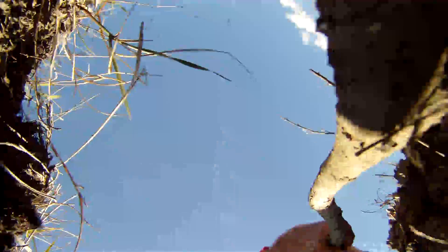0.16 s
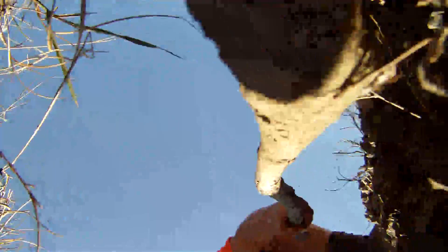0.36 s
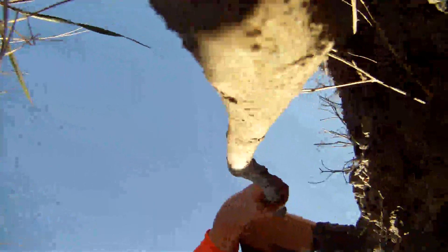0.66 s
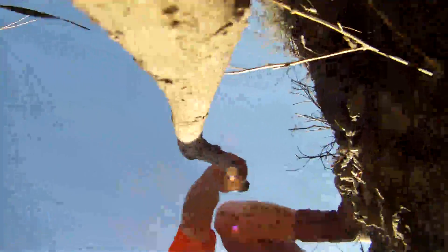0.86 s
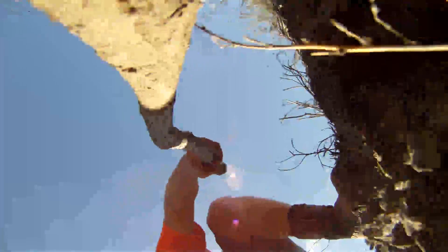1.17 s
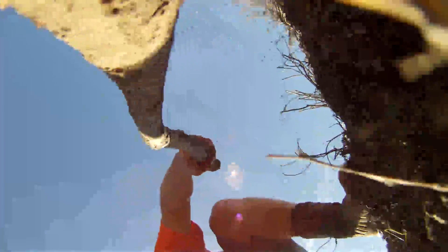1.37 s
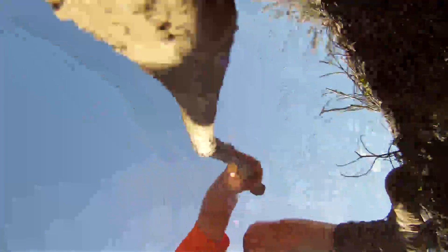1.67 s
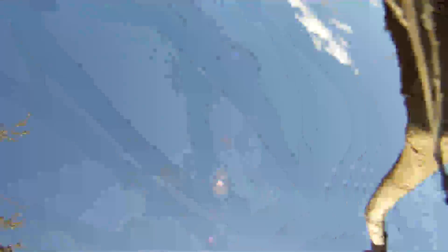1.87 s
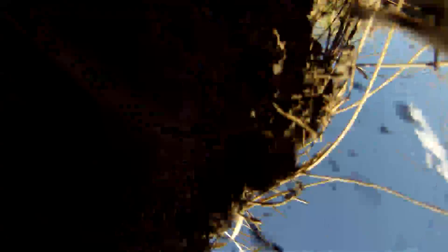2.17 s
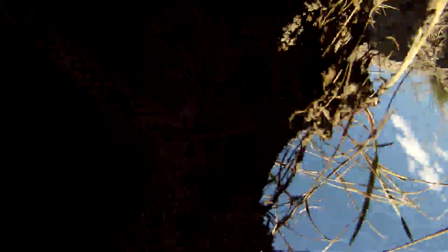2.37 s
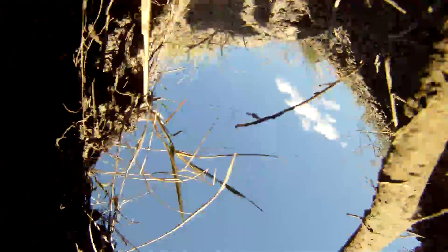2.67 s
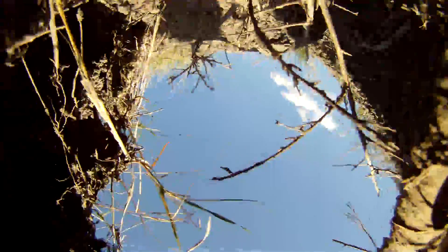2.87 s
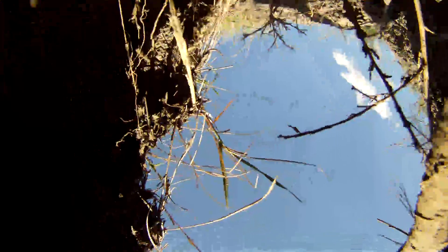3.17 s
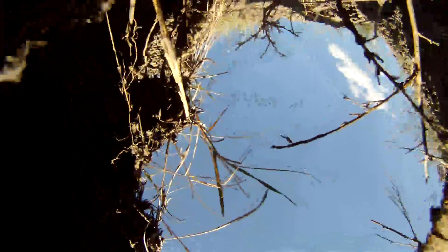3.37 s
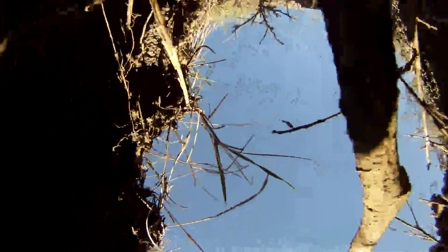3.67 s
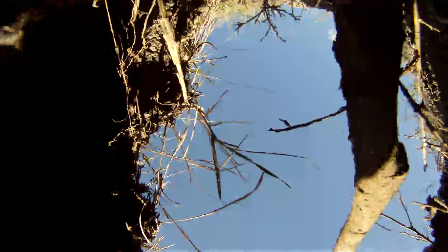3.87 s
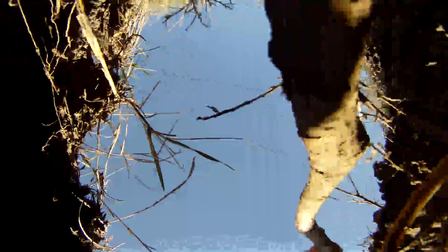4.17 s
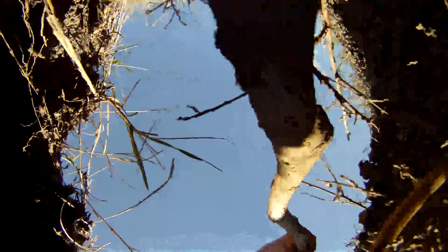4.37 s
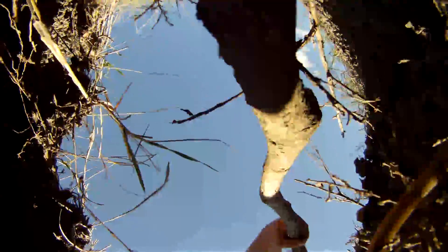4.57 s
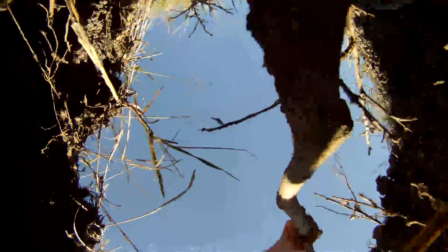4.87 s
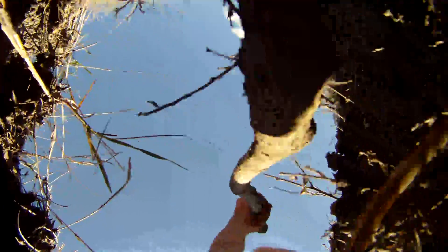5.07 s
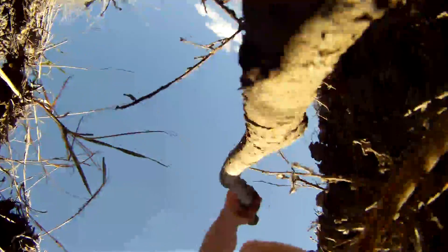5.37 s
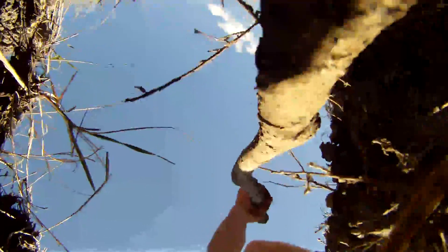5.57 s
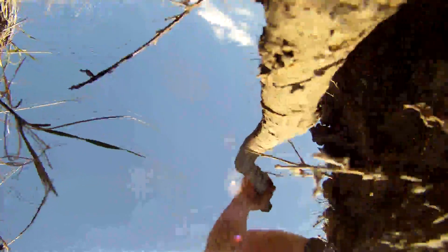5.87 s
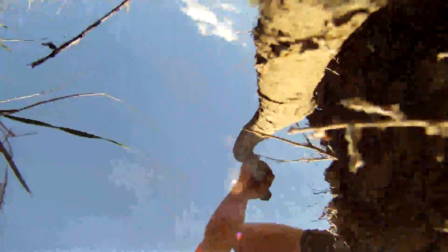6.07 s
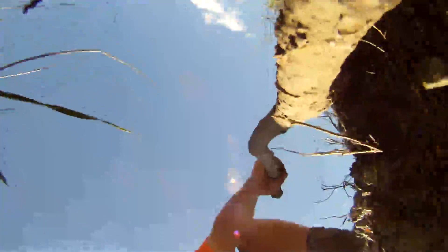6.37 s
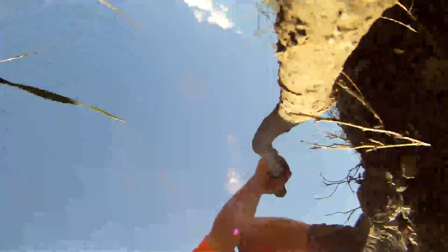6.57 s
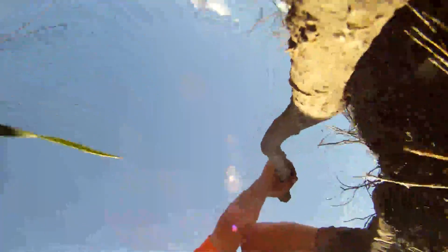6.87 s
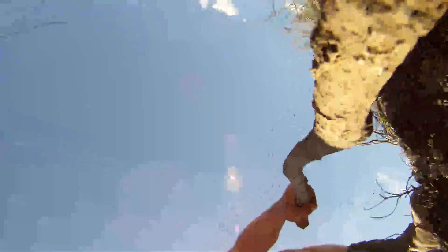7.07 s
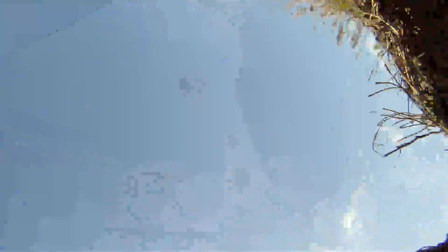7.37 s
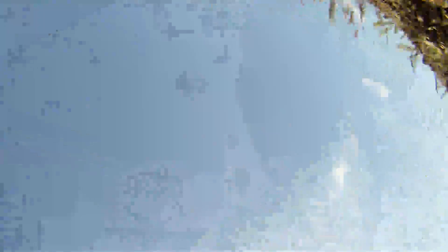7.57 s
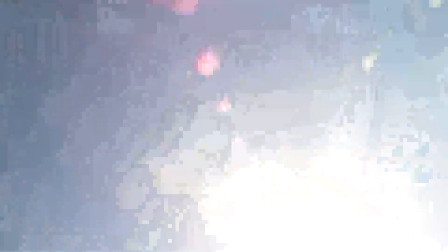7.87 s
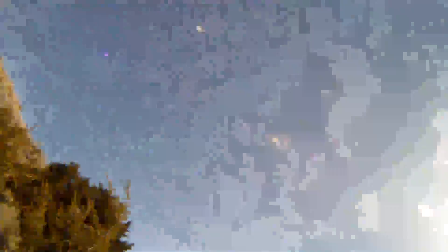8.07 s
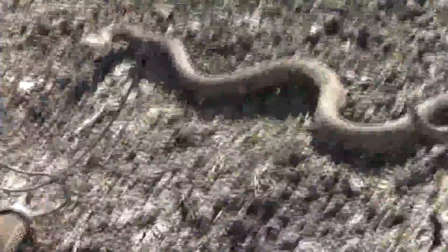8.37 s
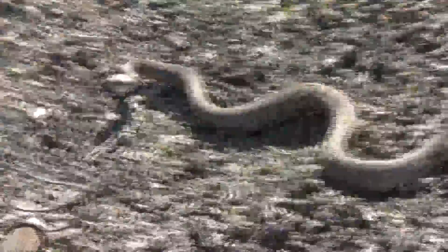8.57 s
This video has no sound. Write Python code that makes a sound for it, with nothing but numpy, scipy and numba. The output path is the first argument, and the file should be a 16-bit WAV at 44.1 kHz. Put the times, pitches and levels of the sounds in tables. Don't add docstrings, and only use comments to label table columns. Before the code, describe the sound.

After a split second of faint dull air, a sealed camera is pushed through dry grass. Stalks scrape, crack and knock loudly on its hard shell, sometimes clipping. A rattlesnake's gritty buzz comes through the shell, most exposed in the calmer middle. Harder knocks return, ending with a huge blow, then an abrupt cut to a clearer, steadier rattle outdoors with light wind and rustling grass.

```python
import sys
import numpy as np
from scipy import signal
from scipy.fft import rfft, irfft
from scipy.io import wavfile
from scipy.ndimage import uniform_filter1d, map_coordinates
from numba import njit

SR = 44100
rng = np.random.default_rng(int(sys.argv[2]) if len(sys.argv) > 2 else 0)


def bounce(signal):
    frames = np.transpose(np.atleast_2d(signal))
    limited = np.clip(frames, -1, 1)
    pcm = np.round(limited * 32767).astype(np.int16)
    wavfile.write(sys.argv[1], SR, pcm)


def attenuation_scalar(level_db):
    decades = np.asarray(level_db, float) / 20
    return 10 ** decades


N = 384993
SLOW_HZ = 12000
M = N * SLOW_HZ // SR + 40

# centre in Hz, width in Hz, level in dB.
BODY = [(413, 385, -4), (702, 205, 6.5), (1106, 122, 0.5)]
# centre in Hz, width in Hz, level in dB.
WALL = [(2100, 210, 4.4), (2750, 260, 0.83)]
# centre in Hz, width in Hz, level in dB.
CORNER = [(3376, 1900, 6.5), (3900, 1750, 7), (4850, 6300, -2)]


def unit(x):
    return x / np.sqrt(np.mean(x ** 2))


def ring(x, hz, width_hz):
    b, a = signal.iirpeak(hz, hz / min(width_hz, SLOW_HZ / 4), fs=SLOW_HZ)
    return signal.lfilter(b, a, x)


def shell(x, modes):
    total = 0
    for k, (hz, width_hz, db) in enumerate(modes):
        mode = ring(ring(x, hz, width_hz), hz, 4 * width_hz)
        total = total + (-1) ** k * attenuation_scalar(db) * mode
    return total


def colour(x, points, sr):
    hz, db = np.transpose(points)
    f = np.arange(len(x) // 2 + 1) * sr / len(x) + 1
    gain = attenuation_scalar(np.interp(np.log(f), np.log(hz), db))
    return unit(irfft(rfft(x) * gain, len(x)))


def curves(table, count, sr):
    s, *columns = np.transpose(table)
    return [np.interp(np.arange(count) / sr, s, c) for c in columns]


def walk(rate_hz, count, sr):
    k = int(sr / rate_hz)
    steps = np.repeat(rng.standard_normal(count // k + 1), k)
    return unit(uniform_filter1d(steps, k)[:count])


def grains(rate_hz, scatter_db, count, sr):
    chance = rng.random(size=(3, count))
    size_db = scatter_db * np.minimum(-np.log(1 - chance[2]), 4)
    return (chance[0] < rate_hz / sr) * np.sign(chance[1] - .5) * attenuation_scalar(size_db)


def swell(s, db, up_ms, down_ms):
    ms = 1000 * (np.arange(M) / SLOW_HZ - s)
    return attenuation_scalar(2 * (db - 12 * np.where(ms < 0, -ms / up_ms, ms / down_ms)))


def contact():
    # time in seconds, pressure in dB, stalk stiffness in dB.
    push = [(.178, -32, -1.5), (.65, -34, -4.5), (.81, -29.5, 1), (1.3, -31, 1.5), (1.96, -37.5, -1.5),
            (2.5, -31.5, 1.5), (2.89, -28, -7), (3.2, -41.5, -5), (3.74, -42.5, -6.5), (4.39, -39.5, -10.5),
            (4.98, -35.5, -7.5), (5.25, -42, -6), (5.99, -28.5, -3), (6.6, -36, 1.5), (6.88, -51, 4),
            (7.1, -36.5, -4.5), (7.95, -28.5, -5), (8.37, -36.5, -1.5)]
    # release in seconds, level in dB, stiffness in dB, build-up in ms.
    scrapes = [(0.328, -21.5, -0.5, 86), (1.305, -24.5, 5, 66), (1.64, -41, 12, 120), (1.739, -13, -6, 5.1),
               (2.352, -16.5, -7, 37), (2.422, -19.5, -9, 39), (2.581, -25.5, 4, 15),
               (2.945, -24, -4.5, 13), (3.494, -43, -1, 440), (4.033, -35.5, 9.5, 9.1),
               (4.278, -27.5, -12, 66), (4.612, -22.5, -32, 27), (4.728, -23, -13, 10),
               (5.077, -27.5, 8.5, 22), (5.165, -31, 3.5, 27), (6.204, -23.5, -6.5, 28),
               (7.056, -23, -4.5, 65), (7.24, -27, -0.5, 120), (7.46, -35, -20, 130),
               (7.583, -13.5, -4, 25), (7.667, -18, -11, 14), (7.792, -22.5, 10, 18),
               (8.19, -24.5, -6.5, 31), (8.321, -19.5, -2, 4.1)]
    # time in seconds, level change in dB.
    dips = [(1.39, -32), (2.5, -4.5), (2.385, -11), (1.98, -1.5), (7.306, -29), (7.845, -11)]
    dip_ms, slip_ms, slip_share = 27, 30, .2
    push_db, stiff_db = curves(push, M, SLOW_HZ)
    t = np.arange(M) / SLOW_HZ
    dip_db = sum(db * np.exp(-(1000 * (t - s) / dip_ms) ** 2) for s, db in dips)
    body = attenuation_scalar(2 * push_db + .4 * dip_db)
    wall = attenuation_scalar(2 * (push_db + stiff_db + dip_db))
    for s, db, hard_db, ms in scrapes:
        rub = swell(s, db, max(ms, 5), slip_ms + slip_share * ms)
        body = body + rub
        wall = wall + rub * attenuation_scalar(2 * (hard_db + dip_db))
    return 10 * np.log10(body), 10 * np.log10(wall)


def drag(body_db, wall_db):
    spurts_db = 1.02 * walk(70, M, SLOW_HZ)
    soft = unit(grains(350, 2.35, M, SLOW_HZ)) + .55 * rng.standard_normal(M)
    sharp = unit(grains(1000, 2.5, M, SLOW_HZ)) + .4 * rng.standard_normal(M)
    body = unit(shell(soft * attenuation_scalar(spurts_db), BODY))
    sharp = sharp * attenuation_scalar(.5 * spurts_db + 3.3 * walk(130, M, SLOW_HZ))
    stiff_db = np.clip(wall_db - body_db, 0, 12)
    wall = attenuation_scalar(-.7 * stiff_db) * unit(shell(sharp, WALL[:1]))
    wall = wall - attenuation_scalar(1.35 * stiff_db - 5.5) * unit(shell(sharp, WALL[1:]))
    wall = wall + attenuation_scalar(-18.0) * unit(shell(sharp, CORNER[1:2]))
    wall = wall + attenuation_scalar(-4.5) * unit(shell(sharp, CORNER[::2]))
    rim = unit(ring(ring(sharp, 1290.0, 640.0), 800.0, 750.0))
    both = body * attenuation_scalar(body_db + 1.0) + wall * attenuation_scalar(wall_db - 1.5)
    dip = 0.33 * ring(both, 1410.0, 700.0)
    return both - dip - rim * attenuation_scalar(0.42 * body_db + 1.0 * wall_db + 9.5)


def rasps():
    # start in seconds, length in ms, level in dB, ring in Hz.
    stems = [(.44, 49, -34.5, 2600), (0.552, 96, -31, 1210), (.74, 130, -25.5, 1250),
             (0.789, 75, -27.5, 5350), (.79, 70, -30.5, 2690), (.97, 35, -16.5, 1080),
             (1.254, 92, -19, 2770), (1.264, 20, -27, 5200), (1.45, 26, -27.5, 4060), (1.57, 19, -22, 1700),
             (1.814, 10.8, -23.5, 2540), (2.243, 23, -28, 2100), (2.6, 95, -31.5, 2090),
             (2.33, 43, -16, 1380), (2.914, 55, -24, 950), (3.581, 18, -32.5, 2100), (4.018, 30, -32, 2750),
             (4.065, 41, -33, 2670), (4.628, 78, -35, 2630), (5.044, 55, -30, 2750),
             (5.149, 58, -32.5, 2750), (5.93, 110, -32, 1310), (6.259, 79, -34, 3120),
             (7.02, 67, -30, 1370), (7.091, 24, -30, 4020), (7.196, 40, -21.5, 2570),
             (7.196, 63, -26.5, 4700), (7.35, 59, -39, 2050), (7.378, 15, -31, 3650),
             (7.548, 36, -22.5, 1740), (7.64, 65, -33, 1970), (7.64, 140, -28, 700), (7.885, 27, -24, 905),
             (7.795, 28, -15, 2550), (8.09, 100, -39, 2110), (8.1, 195, -40.5, 3760), (8.17, 29, -29, 1100),
             (8.316, 21, -19, 640), (8.3333, 5.3, -4.5, 920), (1.996, 37, -12.5, 2100)]
    width_share, edge_share = .22, .3
    count = 3000
    out = np.zeros(M)
    for s, ms, db, hz in stems:
        slips = unit(grains(900, 2.6, count, SLOW_HZ)) + 0.33 * rng.standard_normal(count)
        size = int(np.clip(ms, 5, 200) * SLOW_HZ / 1000)
        push = np.pad(signal.windows.tukey(size, edge_share), (0, count - size))
        rung = ring(ring(slips, hz, width_share * hz), hz, 2 * width_share * hz)
        i = int(s * SLOW_HZ)
        out[i:i + count] += attenuation_scalar(db) * unit(rung) * push
    return out


def add(out, s, db, ms, hz, modes, share):
    t = np.arange(1200) / SLOW_HZ
    u = t / np.clip(ms / 1000, .0003, .02)
    push = u * np.exp(-.8 * u - 0.06 * u ** 2)
    grit = rng.standard_normal(len(t))
    place = unit(push * np.sin(2 * np.pi * hz * t + grit[0]))
    blow = place + share * unit(shell(push * grit, modes))
    blow = signal.lfilter([1, -1], [1, -np.exp(-hz / SLOW_HZ)], blow)
    i = int(s * SLOW_HZ)
    out[i:i + len(t)] += attenuation_scalar(db) * blow / np.abs(blow).max()


def body_blows(out):
    # time in seconds, peak in dB, ring in Hz, length in ms.
    knocks = [(0.338, 6, 363, 6.8), (0.8696, -14, 1205, 15), (0.9256, -12, 1090, 7.3),
              (0.9414, 1.5, 1142, 6.6), (1.199, -11.5, 960, 4.9), (1.3305, -7.5, 1010, 8.3),
              (1.372, 2.5, 1270, 3.5), (1.6593, -10, 1280, 5.8), (1.6905, -8, 930, 10.4),
              (1.7213, -1, 910, 4.1), (1.9194, -8.5, 1025, 2.8), (1.9493, -1, 1000, 3.6),
              (1.962, -1.5, 1300, 2), (2.0135, -11, 944, 22), (2.125, -2.5, 704, 7.5),
              (2.3399, -12.5, 557, 30), (2.4283, 5.5, 1084, 4.5), (2.562, -10.5, 760, 10.3),
              (2.5836, -8.5, 603, 13), (2.721, -9, 880, 0.75), (2.7591, -9, 1210, 2),
              (4.5762, -8.5, 635, 9.5), (5.0751, -7.5, 380, 0.83), (5.852, -9.5, 1070, 1.4),
              (6.115, 5, 527, 2.1), (6.3993, -15.5, 1360, 2.1), (7.239, -9.5, 444, 9.1),
              (7.2576, -3, 770, 11), (7.7501, 3.5, 984, 4.1), (8.337, 13, 645, 7.5)]
    # time in seconds, peak in dB.
    nudges = [(.183, -15.5), (0.9815, -5), (3.2742, -15.5), (3.7583, -19.5), (3.8521, -13.5), (3.87, -16),
              (3.9234, -14), (4.2198, -12.5), (4.5197, -15.5), (4.612, -11), (4.7426, -13), (6.2805, -12),
              (7.006, -15)]
    # time in seconds, peak in dB.
    patter = [(.316, -8), (1.1425, -9.5), (1.246, -10.5), (1.744, -1.5), (2.8606, -11), (2.9147, -7.5),
              (3.0708, -14.5), (3.438, -19), (3.506, -12.5), (3.5806, -18), (3.955, -22), (3.973, -18.5),
              (3.989, -21), (4.005, -17.5), (4.233, -19), (4.671, -13.5), (4.7144, -10), (4.727, -16),
              (5.298, -18.5), (5.3568, -13), (5.4775, -11), (5.517, -13), (5.5504, -14), (6.493, -13),
              (6.5825, -18), (6.6134, -9), (7.6007, -3.5), (7.9649, -11)]
    # time in seconds, peak in dB, ring in Hz.
    taps = [(0.241, -23, 694), (0.406, -11, 666), (0.555, -13.5, 1150), (1.483, -18, 818),
            (1.547, -19, 685), (1.899, -13.5, 694), (2.401, -26, 1030), (2.709, -10, 890),
            (3.462, -24, 1050), (3.487, -21, 623), (3.594, -19, 622), (3.884, -20, 654),
            (4.185, -21.5, 583), (4.294, -16, 696), (4.632, -21, 716), (5.639, -19, 750), (5.685, -22, 635),
            (6.121, -4.5, 720), (6.793, -29.5, 786), (7.135, -24, 654), (7.354, -16, 640),
            (7.644, -14, 600), (7.658, -9, 721), (7.717, -14, 655), (7.858, -7.5, 670), (7.947, -8.5, 694),
            (7.987, -11.5, 870), (8.179, -13.5, 716)]
    for s, db, hz, ms in knocks:
        add(out, s - .0006, db + 5.5, 0.26 * ms, hz, BODY, .6)
    for s, db in nudges:
        add(out, s, db, 2.7, 675., BODY, .6)
        add(out, s, db - 18.0, .45, 1500., WALL, .6)
    for s, db in patter:
        add(out, s, db, 1.6, 665., BODY, .55)
        add(out, s, db - 9.5, .4, 1500., WALL, .7)
    for s, db, hz in taps:
        add(out, s, db - 2.0, 1.3, hz, BODY, .5)


def wall_blows(out):
    # time in seconds, peak in dB, ring in Hz.
    flicks = [(0.2775, -14, 1930), (0.307, -18, 1990), (0.319, -10, 1780), (0.9803, -11.5, 1810),
              (1.3223, -9, 2350), (1.7202, 0.5, 2720), (1.92, 1.5, 2750), (1.95, -1.5, 2780),
              (1.962, 4.5, 2890), (2.041, -12, 2740), (2.338, -9, 2540), (2.757, -13, 2000),
              (4.038, -13.5, 2750), (5.055, -13.5, 2940), (5.187, -29, 2600), (6.4902, -18.5, 2850),
              (7.2451, -5, 2680), (7.7903, 4, 2580), (7.801, 0, 2470), (8.0482, -16.5, 1700),
              (8.0795, -18.5, 1890)]
    # time in seconds, peak in dB, ring in Hz, length in ms.
    snaps = [(.34, 4, 1940, 3.7), (.9427, 6.5, 1930, 1.56), (1.0059, -6.5, 2190, 5.1),
             (1.0591, -3, 2070, 4.6), (1.11, -6.5, 2140, 5.5), (1.1447, 3, 2670, 3.1),
             (1.1985, -11.5, 2750, 2.5), (1.334, 0, 2360, 3.9), (1.3515, -11, 2040, 3.8),
             (1.3715, 8, 2180, 4.7), (1.7375, -2, 2190, 3.3), (2.2363, -11, 2100, 4.1),
             (2.352, 0, 1970, 9.8), (2.584, -15, 1870, 2.9), (4.8918, -24, 2490, 8.5), (5.075, -8, 2760, 6),
             (5.8518, -18, 2020, 3.6), (6.1119, -19, 2000, 9.1), (7.2386, -7.5, 2420, 3.2),
             (7.2592, -1, 1760, 6.8), (7.6026, -8.5, 1960, 6.7), (7.7466, 3.5, 2328, 8),
             (7.7725, -2, 2650, 5.5), (7.9304, -18, 2330, 5.7), (8.3351, -4, 1835, 6.2)]
    # time in seconds, peak in dB, ring in Hz, length in ms.
    breaks = [(1.443, -18, 1730, 4.1), (1.6202, -17.5, 2700, 3.2), (1.6396, -13, 2530, 4.2),
              (1.6589, 1.5, 2520, 5.6), (1.6919, 9, 2090, 3.9), (2.0095, -4.5, 2130, 9.5),
              (2.0789, -20, 2720, 5.7), (2.1244, -10, 2030, 2.03), (2.189, -25, 2140, 4.7),
              (2.2463, -16, 2130, 2.9), (2.4258, -1, 2210, 6.2), (2.7809, -9.5, 2080, 4.2),
              (2.8037, -14.5, 1940, 1.4), (3.0709, -14, 1890, 3.3), (5.7075, -20, 2150, 1.15),
              (6.6115, -23.5, 2350, 2), (8.3185, -22, 1780, 3.7)]
    # time in seconds, peak in dB.
    ticks = [(0.7665, -11), (1.0326, -5), (1.0823, -1), (1.482, -14), (1.677, 4), (2.477, -7), (4.023, -14),
             (4.065, -17), (6.652, -18), (7.0904, -14.5), (7.819, -7), (7.9037, -14)]
    # time in seconds, peak in dB, ring in Hz.
    pricks = [(0.4554, -13, 2050), (0.4968, -20, 2030), (1.102, -5, 2220), (1.1317, -11, 2060),
              (1.18, -5, 2150), (1.247, -6, 2170), (1.506, -17, 2010), (1.548, -14, 3980),
              (1.5807, -7, 1730), (1.607, -11, 2700), (1.7868, -15, 2080), (1.7964, -17, 2860),
              (1.8167, -18, 2080), (2.3007, -12, 2030), (2.439, 0, 2060), (2.5164, -20, 1990),
              (2.565, -11, 2130), (2.6518, -9, 2090), (2.6998, -12, 2010), (2.861, -12.5, 3930),
              (2.914, -16, 3760), (3.4615, -17, 2140), (3.5052, -11, 2140), (3.582, -22, 2070),
              (4.7142, -24, 2020), (4.7292, -16, 2000), (4.819, -19, 3000), (4.9142, -16, 2010),
              (6.2703, -18, 2160), (6.298, -9, 2400), (6.3594, -14, 2010), (6.519, -13, 2450),
              (6.6294, -20, 2670), (6.8937, -26.5, 2160), (6.923, -19, 2250), (6.98, -19.5, 2250),
              (7.004, -12, 2120), (7.195, -13, 2280), (7.4619, -22, 1970), (7.5453, -18, 1900),
              (7.6287, -14, 3500), (7.6427, -4.5, 1740), (7.7094, -18, 2050), (7.857, -18, 3530),
              (2.034, -5, 2750), (7.8923, -13, 2190)]
    flick_ms = 3.9
    timed_flicks = [(*row, flick_ms) for row in flicks]
    for rows, crack_db in ((timed_flicks, -13.5), (snaps, -7.5), (breaks, 1)):
        for s, db, hz, ms in rows:
            add(out, s - .0004, db + 5.0, 0.31 * ms, hz, WALL, .8)
            add(out, s - .0004, db + crack_db + 8.0, 0.38 * ms, 3950., CORNER, 3.0)
    for s, db in ticks:
        add(out, s, db, .9, 2750., [*WALL, *CORNER], 2)
    for s, db, hz in pricks:
        add(out, s, db - 3.0, .7, hz, [*WALL, *CORNER[1:2]], .8)


def heavy_blows(out):
    # time in seconds, peak in dB, ring in Hz, length in ms.
    bumps = [(0.3362, -20.5, 331, 23), (1.1991, -22, 344, 5.4), (1.371, -23, 257, 11),
             (1.689, -25.5, 183, 8.5), (4.431, -35, 190, 20), (5.0738, -16.5, 243, 7.8),
             (6.115, -31, 370, 24), (6.611, -34, 323, 16), (7.2571, -14.5, 248, 15)]
    # time in seconds, peak in dB, ring in Hz.
    thumps = [(1.197, -23, 120), (2.71, -23, 115), (2.991, -25, 135), (3.09, -31, 75), (3.525, -30, 199),
              (3.67, -23.5, 88), (4.029, -27, 62), (4.095, -27, 80), (4.25, -33, 60), (4.61, -29, 60),
              (5.075, -17, 106), (6.985, -22.5, 199), (7.454, -20.5, 110), (7.664, -17.5, 54.7),
              (4.83, -31.5, 151), (5.05, -25, 60)]
    for s, db, hz, ms in bumps:
        add(out, s - .0012, db + 8.5, 0.29 * ms, hz, BODY, .1)
    for s, db, hz in thumps:
        add(out, s - .5 / hz, db - 1.5, 520.0 / hz, hz, BODY, .02)


def blows():
    out = np.zeros(M + 1200)
    body_blows(out)
    wall_blows(out)
    heavy_blows(out)
    return out[:M]


def shaking(swing_hz, wobble, depth, both, count, sr):
    phase = 2 * np.pi * np.cumsum(swing_hz * (1 + wobble * walk(17, count, sr))) / sr
    return np.exp(depth * np.cos(phase) + both * np.cos(2 * phase))


def tail():
    # time in seconds, level in dB, echo notch in Hz.
    buzz = [(.2, -53, 5200), (.4, -38.5, 5200), (.8, -45.5, 5200), (1.2, -56, 4340), (2.5, -55, 4300),
            (2.66, -41, 4750), (2.98, -34.5, 4870), (3.67, -41.5, 4600), (3.76, -51.5, 4650),
            (3.86, -35, 4580), (4.15, -42.5, 4610), (5.15, -45.5, 4470), (5.4, -35, 4440),
            (5.64, -38.5, 4470), (5.78, -36, 4900), (6.3, -44, 4910), (6.78, -60.5, 4600),
            (6.87, -65, 4500)]
    # time in seconds, swings per second.
    shake = [(3.0, 84), (3.35, 81), (5.3, 67), (5.65, 72.5), (6.3, 80)]
    # time in seconds, low path in dB, high path in dB.
    angle = [(2.6, -18.5, 0), (2.9, -3, -2.5), (3.2, 3, 0.5), (3.45, 4.5, -0.5), (3.7, 5, 1),
             (3.95, -4, -12), (4.4, 2, -0.5), (4.75, 8.5, 1), (5.1, 10, 2), (5.4, -1, 1), (5.7, -1.5, -6),
             (6.3, 3, 0.5)]
    # centre in Hz, width in Hz, level in dB.
    gaps = [(3196, 440, -2.5), (4050, 1800, -1), (5380, 1040, 4.5)]
    level_db, notch_hz = curves(buzz, M, SLOW_HZ)
    swing_hz, = curves(shake, M, SLOW_HZ)
    low_db, high_db = curves(angle, M, SLOW_HZ)
    clash = grains(3000, 2.8, M, SLOW_HZ) * shaking(swing_hz, .015, .16, .17, M, SLOW_HZ)
    lag = np.clip(3.5 * SLOW_HZ / notch_hz, 1, 38)
    clash = clash + .85 * map_coordinates(clash, [np.arange(M) - lag], order=5)
    heard = 0
    for k, (hz, width_hz, db) in enumerate(gaps):
        edges_hz = np.clip([hz - width_hz / 2, hz + width_hz / 2], 100, 5950)
        if k == 2:
            path = signal.butter(2, edges_hz[0], "high", fs=SLOW_HZ, output="sos")
        else:
            path = signal.butter(2, edges_hz, "band", fs=SLOW_HZ, output="sos")
        path_db = db + level_db + (low_db, 0, high_db)[k] + 1.85 * walk(7.8, M, SLOW_HZ)
        heard = heard + (-1) ** k * attenuation_scalar(path_db) * unit(signal.sosfilt(path, clash))
    return heard


def swing():
    # time in seconds, level in dB.
    breeze = [(.2, -51), (3.6, -43), (5.6, -54.5), (8.0, -45)]
    # time in seconds, level in dB.
    jerks = [(.33, -36), (1.66, -32), (2.35, -42), (2.6, -43), (3.0, -38.5), (3.66, -39), (4.04, -31.5),
             (4.25, -42), (4.62, -35.5), (4.85, -48), (5.07, -35.5), (5.72, -39.5), (7.25, -29.5),
             (7.45, -49), (7.57, -39), (7.68, -29), (8.2, -41), (8.33, -45)]
    breeze_db, = curves(breeze, M, SLOW_HZ)
    power = attenuation_scalar(2 * breeze_db) + sum(swell(s, db, up_ms=79, down_ms=79) for s, db in jerks)
    return 10 * np.log10(power)


def sway(db):
    points = [(12, -32), (30, -2.0), (70, 3.5), (150, 0.5), (260, -1.5), (500, -18.0)]
    air = colour(rng.standard_normal(M), points, SLOW_HZ)
    return air * attenuation_scalar(db + 2.6 * walk(16, M, SLOW_HZ))


@njit
def follow(x, attack, release):
    y, e = np.empty(len(x)), 0.
    for i in range(len(x)):
        e += (abs(x[i]) - e) * (attack if abs(x[i]) > e else release)
        y[i] = e
    return y


def hold(x):
    held = np.repeat(np.clip(x, -1, 1), 4)
    held = signal.resample_poly(held, 147, 160)[:N]
    return signal.sosfilt(signal.ellip(12, .3, 80, 15350, fs=SR, output="sos"), held)


def housed():
    x = drag(*contact()) + tail() + sway(swing()) + blows() + rasps()
    attack_s, release_s = .011, .053
    loud = follow(x, 1 / (attack_s * SLOW_HZ), 1 / (release_s * SLOW_HZ))
    x = 0.99 * x / (1 + (loud / 0.44) ** 2)
    x = signal.lfilter([1, .8], [1, .6], x)
    return hold(x)


def open_air():
    # frequency in Hz, density in dB per Hz.
    rattle_points = [(1180, -65), (2000, -27), (2640, -21.5), (3350, -10.5), (3920, -16), (5630, -4),
                     (8150, -11.5), (11600, -14.5), (15700, -29)]
    # time in seconds, level in dB.
    rustle = [(8.45, -50), (8.6, -61), (8.645, -40), (8.688, -54), (8.72, -34)]
    wind_points = [(10, -3.5), (35, -18), (100, -23.5), (300, -27.5), (600, -44)]
    grass_points = [(200, -19), (500, -8.0), (1200, -9.5), (2500, -16.0), (5000, -31)]
    tail_db, wind_db = -29.5, -44 + 4 * walk(22, N, SR)
    grass_db, = curves(rustle, N, SR)
    clash = unit(grains(7000, 2, N, SR)) * shaking(74, .1, .14, .09, N, SR)
    rattle = colour(clash, [*rattle_points, (15900, -90)], SR)
    wind = colour(rng.standard_normal(N), wind_points, SR)
    grass = colour(grains(3100, 5.0, N, SR), grass_points, SR)
    return rattle * attenuation_scalar(tail_db) + wind * attenuation_scalar(wind_db) + grass * attenuation_scalar(grass_db)


def hollow():
    # frequency in Hz, density in dB per Hz.
    air_points = [(18, -63), (30, -36), (129, -21), (212, -23), (500, -34), (3500, -51), (4800, -55),
                  (5900, -68)]
    air = colour(rng.standard_normal(M), air_points, SLOW_HZ) * attenuation_scalar(-53.5)
    return hold(air) * attenuation_scalar(2.5 * walk(35, N, SR))


def scene():
    cut_in_s, cut_out_s = .169, 8.379
    t = np.arange(N) / SR
    return np.select([t < cut_in_s, t < cut_out_s], [hollow(), housed()], open_air())[None]


def band_limit(x):
    return signal.sosfilt(signal.butter(12, 16410, fs=SR, output="sos"), x)


def record(dry):
    mix = np.clip(dry, -1, 1)
    return band_limit(mix)


dry = scene()
out = record(dry)
bounce(out)
```